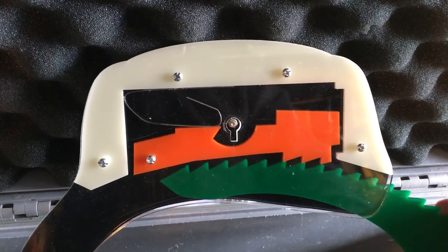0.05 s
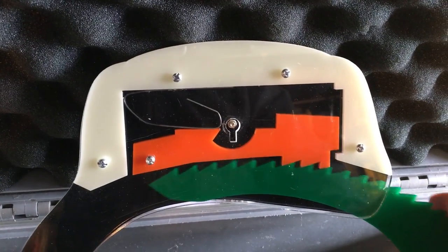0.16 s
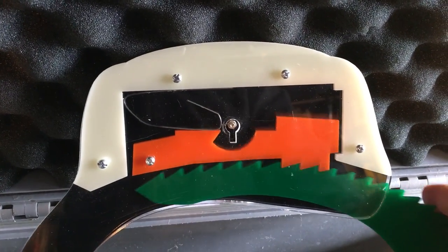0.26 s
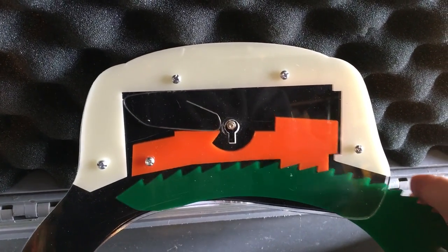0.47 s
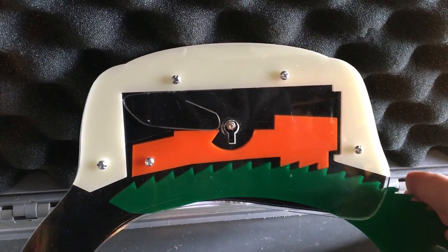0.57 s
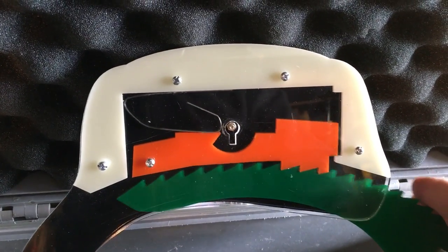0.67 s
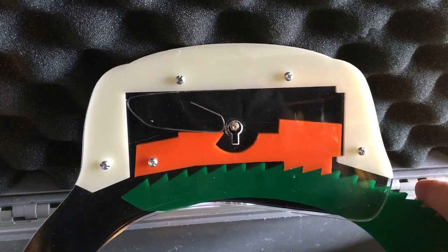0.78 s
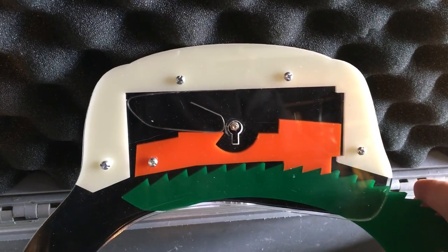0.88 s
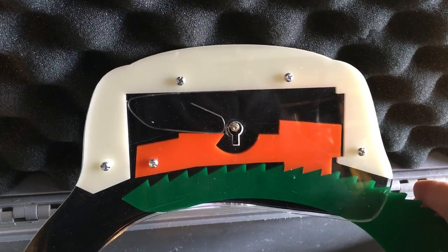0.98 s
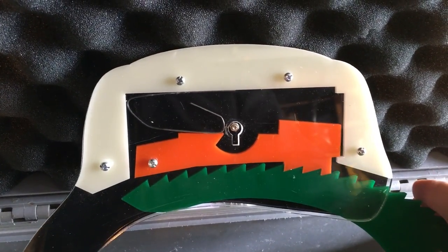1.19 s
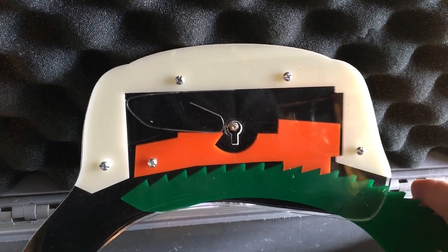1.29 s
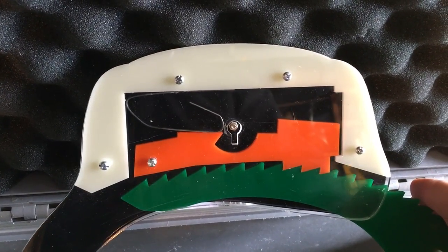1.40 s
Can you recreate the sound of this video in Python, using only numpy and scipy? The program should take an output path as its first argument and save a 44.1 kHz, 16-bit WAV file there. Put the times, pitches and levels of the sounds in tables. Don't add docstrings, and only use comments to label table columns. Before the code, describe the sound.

A hard ratchet pawl clacks over three teeth, then a faint settling tick, very close and dry.

```python
import sys
import numpy as np
from scipy import signal
from scipy.fft import rfft, irfft
from scipy.io import wavfile

SR = 44100
rng = np.random.default_rng(int(sys.argv[2]) if len(sys.argv) > 2 else 0)


def to_wav(sig):
    pcm = np.clip(np.atleast_2d(sig), -1, 1) * 32767
    pcm = np.round(pcm).astype(np.int16)
    wavfile.write(sys.argv[1], SR, pcm.T)


def invert_db(x):
    u = np.asarray(x, float) / 20
    return 10 ** u


N = 63945

# [Hz, dB per Hz]
AIR_SPECTRUM = [(20, -26.5), (40, -9.5), (70, -0.74), (135, -10), (180, -17.5), (550, -30), (980, -28),
                (2500, -38), (16000, -56.5)]
# [Hz, dB per Hz]
FRICTION_SPECTRUM = [(1000, -10), (2000, 2), (4000, -0.4), (8000, -3.5), (12000, -6), (16000, -7)]
# [Hz, s]
ROOM_DECAY = [(300, .12), (1000, 0.27), (2500, 0.19), (6000, 0.16), (12000, 0.1), (16000, .09)]
# [Hz, dB]
ROOM_SPECTRUM = [(300, -5), (1000, -3), (3000, 0.5), (5000, 0.5), (8000, -4.5), (12000, -7.5),
                 (16000, -11.5)]
ROOM_DROP_DB = [
    -1.5,
    -2.5,
    -2.5,
]
# [Hz, dB, s]
CASE_MODES = [(124, -30, .22), (141.5, -30.5, .15), (170.2, -31.5, 0.029), (210.7, -26, 0.06),
              (240, -28, 0.06), (300, -29, 0.082), (480, -48, 0.057), (610, -48.5, .03)]
# [s, dB]
THUMPS = [
    (.2040, -1.5),
    (.3435, -4),
    (0.531, -3.5),
]
# [Hz, s]
PLATE_MODES = [(530, .05), (630, .06), (925, .05), (1040, .05), (1180, .055), (1450, .035), (1650, .04)]
PLATE_DB = [
    [-48, -41, -41, -37, -44.5, -33.5, -37],
    [-41, -39.5, -46.5, -38.5, -40.5, -40, -38.5],
    [-45.5, -34.5, -28, -34.5, -32, -28, -26.5],
]
# [Hz, dB, s]
FIRST_TOOTH_MODES = [(1165, -23, 0.055), (1600, -23, 0.058), (1805, -17, 0.04), (2083, -3, .026),
                     (2240, -10.5, .019), (3000, -3, 0.013), (3280, -12, 0.036), (4310, -4, .02),
                     (5500, -6.5, 0.015), (6200, -8, .025), (7600, -13.5, 0.01), (9490, -10.5, .012),
                     (14000, -16.5, 0.011)]
SECOND_TOOTH_MODES = [(1151, -21, .04), (1600, -22, 0.032), (2026, -9.5, 0.022), (2486, -15, .018),
                      (2817, -9.5, 0.026), (3360, -5.5, 0.019), (4300, -1, .012), (4940, -13, 0.0047),
                      (5895, -3.5, 0.02), (6658, -9.5, 0.023), (8880, -19, 0.02), (11295, -16.5, 0.014),
                      (13800, -17, 0.0071)]
THIRD_TOOTH_MODES = [(1310, -12.5, 0.02205), (1976, -19.5, 0.029), (2116, -18, 0.024), (2539, -6.5, .024),
                     (3320, -8.5, 0.021), (3800, -13.5, 0.02), (4300, -0.5, 0.018), (5054, -17.5, .018),
                     (5880, -5.5, 0.025), (7400, -19.5, .02), (8220, -11, .016), (10900, -17.5, .014),
                     (12800, -12.5, 0.012)]
PIN_DB = [
    -11.5,
    -9,
    -4,
]
# [Hz, dB, s]
WIRE_MODES = [(1930, -39.5, .12), (4480, -46, 0.15), (7150, -49, .12), (11480, -43, .14),
              (11650, -44.5, .16)]
# [s, s, dB]
SCRAPES = [
    (.1935, .007, -46),
    (.335, .0055, -49.5),
    (.523, .0055, -44.5),
]
# [s, dB, Hz, s, dB]
TICKS = [(.1800, -50, 3100, 0.013, 3), (.1940, -21, 3050, 0.024, 3), (0.197, -41, 2610, 0.012, -17),
         (.1960, -16, 2090, 0.0084, -13), (0.2005, -49, 1800, 0.014, -9), (0.2542, -38, 1930, 0.016, -20),
         (0.238, -54, 3560, 0.012, 5), (0.334, -31.5, 2420, 0.022, -2.5),
         (0.3394, -19.5, 4420, 0.0049, 1.5), (0.4295, -48.5, 2020, 0.01, -5),
         (0.4443, -40, 1670, 0.012, -19), (0.4452, -43, 2260, 0.012, -24.5),
         (0.4452, -41.5, 930, 0.017, -23), (0.461, -50, 1900, 0.013, -15),
         (0.5075, -49.5, 4300, 0.0073, -5.5), (.5236, -38.5, 2560, .018, 3.5),
         (.5260, -33.5, 3525, .012, -3), (.7899, -37.5, 3330, 0.012, -13),
         (0.7907, -31.5, 2063, 0.011, 5.5), (0.7907, -37.5, 3450, 0.019, -12),
         (0.7907, -46, 1275, 0.029, -30), (0.7892, -38.5, 5550, 0.015, -4.5),
         (0.7929, -34, 2144, 0.0057, -6), (0.7930, -39.5, 4700, 0.012, -17),
         (0.7950, -39, 1600, 0.015, -23), (0.798, -43, 1746, 0.012, -30), (0.8011, -43, 1760, .012, -30),
         (0.518, -54.5, 4130, 0.012, -5.5), (0.18, -57, 11600, 0.012, -3), (0.508, -60, 11800, 0.016, -5),
         (0.822, -50.5, 1736, .016, -9)]
# [s, dB, count, dB per octave]
BLOWS = [(0.2008, -10, 0, 6.5), (0.2014, -5, 0, -1.6), (0.2021, -9.5, 0, 3.9), (.2031, -9, 0, -2.5),
         (0.2051, -10.5, 0, -0.5), (0.2106, -21, 0, -3), (0.2113, -20.5, 0, -9.5), (.3404, -2.5, 1, -0.26),
         (0.3408, -7.5, 1, 1.9), (.3420, -5.5, 1, 1.6), (0.3435, -8.5, 1, -1), (0.3446, -20, 1, -3),
         (0.35, -21, 1, -2.5), (0.352, -23.5, 1, -10.5), (0.5281, -12, 2, 0), (0.5286, -0.5, 2, 1),
         (0.5298, -8.5, 2, -5.5), (0.5303, -8.5, 2, 5.5), (0.5326, -18.5, 2, -7), (0.535, -14.5, 2, 0.34),
         (0.538, -30, 2, -2.5)]


def read(points, hz):
    frequency_hz, value = np.transpose(points)
    return np.interp(np.log(hz + 1), np.log(frequency_hz + 1), value)


def add(mix, start_s, sound):
    part = mix[round(start_s * SR):][:len(sound)]
    part += sound[:len(part)]


def coloured(points):
    gain = invert_db(read(points, np.fft.rfftfreq(N, 1 / SR)))
    noise = irfft(rfft(rng.standard_normal(N)) * gain, N)
    return noise / noise.std()


def ring(modes, phases, tilt_db=0, size=8000):
    t = np.arange(size)[:, None] / SR
    hz, level_db, t60_s = np.transpose(modes)
    envelope = invert_db(level_db + tilt_db * np.log2(hz / 3000) - 60 * t / t60_s)
    return (envelope * np.sin(2 * np.pi * (hz * t + phases))).sum(1)


def crack(low_hz, t60_s, top_hz):
    t = np.arange(4000) / SR
    noise = signal.lfilter(*signal.butter(1, min(low_hz, 9000), "high", fs=SR), rng.standard_normal(4000))
    return signal.lfilter(*signal.butter(2, top_hz, fs=SR), noise) * invert_db(-60 * t / t60_s)


def air():
    return invert_db(-51.5) * coloured(AIR_SPECTRUM)


def slide():
    from_s, to_s = .193, .94
    t = np.arange(N) / SR
    onset = np.clip((t - from_s) / 0.013, 0, 1)
    release = np.clip((to_s - t) / 0.0029, 0, 1)
    level_db = -65.5 + 0.5 * (t - from_s) / (to_s - from_s)
    return onset * release * invert_db(level_db) * coloured(FRICTION_SPECTRUM)


def room(source):
    gap_s, late_db, late_t60_s = .002, -29.5, 0.96
    out = np.zeros(N)
    drop_index = np.digitize(np.arange(N) / SR, [.3, .5])
    for k in range(3):
        hz, t, noise = signal.stft(rng.standard_normal(SR // 2), SR, nperseg=128)
        early = invert_db(-60 * t / read(ROOM_DECAY, hz)[:, None])
        late = invert_db(late_db - 60 * t / late_t60_s)
        colour = invert_db(read(ROOM_SPECTRUM, hz))[:, None]
        tail = signal.istft(noise * (early + late) * colour, SR, nperseg=128)[1]
        tail *= np.arange(len(tail)) / SR > gap_s
        tail /= np.linalg.norm(tail)
        out += invert_db(ROOM_DROP_DB[k]) * signal.fftconvolve(source * (drop_index == k), tail)[:N]
    return invert_db(-18) * out


def case():
    thump_rise_s, plate_rise_s = 0.0061, .002
    out = np.zeros(N)
    t = np.arange(12000) / SR
    for (start_s, level_db), plate_db, (blow_s, *_) in zip(THUMPS, PLATE_DB, BLOWS[1::7]):
        thump = (1 - np.exp(-t / thump_rise_s)) * ring(CASE_MODES, 0, size=12000)
        add(out, start_s, invert_db(level_db) * thump)
        plates = [(hz, db, t60_s) for (hz, t60_s), db in zip(PLATE_MODES, plate_db)]
        add(out, blow_s, (1 - np.exp(-t / plate_rise_s)) * ring(plates, 0, size=12000))
    return out


def squeak(out):
    start_s, end_s, pitch_hz, level_db, grow_db = .1815, .1945, 3180, -44, 10
    t = np.arange(0, end_s - start_s, 1 / SR)
    growth = invert_db(level_db - grow_db * (1.5 - t / t[-1]))
    add(out, start_s, growth * np.sin(2 * np.pi * pitch_hz * t))


def scrapes(out):
    for start_s, length_s, level_db in SCRAPES:
        add(out, start_s, invert_db(level_db) * crack(2500, .05, 13000)[:round(length_s * SR)])


def ticks(out, spread):
    rise_s = 0.0002
    for start_s, level_db, hz, t60_s, crack_db in TICKS:
        modes = [(hz, 0, t60_s), (hz * 1.45, -11.5, t60_s * .8),
                 (hz * 0.64, -10.5, t60_s), (hz * 2.3, -25, t60_s * .7)]
        body = ring(modes, 0, size=4000)
        rise = np.minimum(np.arange(4000) / SR / rise_s, 1)
        tick = invert_db(level_db) * rise * (body + invert_db(crack_db) * crack(hz, 2.9 * t60_s, 1.3 * hz))
        add(out, start_s, tick)
        add(spread, start_s, tick)


def blows(out, spread):
    pin_hz, pin_t60_s = 11650, .024
    detune, damping = .02, .5
    blunt_db, spread_t60_s = -15, .002
    teeth = (FIRST_TOOTH_MODES, SECOND_TOOTH_MODES, THIRD_TOOTH_MODES)
    for start_s, level_db, tooth_index, tilt_db in BLOWS:
        k = int(round(tooth_index))
        modes = np.vstack([teeth[k], [(pin_hz, PIN_DB[k], pin_t60_s)]])
        chance, phases = rng.random((2, len(modes)))
        shift = 1 + detune * (chance - .5)
        loss = np.minimum(2000 / modes[:, 0], 1) ** damping
        shifted = modes * np.transpose([shift, np.ones(len(modes)), loss])
        body = ring(shifted, phases, tilt_db)
        t = np.arange(len(body)) / SR
        add(spread, start_s, invert_db(level_db + blunt_db - 60 * t / spread_t60_s) * body)
        add(body, 0, invert_db(-3.5 + 2 * tilt_db) * crack(2340, 0.0069, 13000))
        add(body, 0, invert_db(-16) * crack(1300, 0.035, 12900))
        add(body, 0, ring(WIRE_MODES * np.array([shift[0], 1, 1]), phases[:len(WIRE_MODES)]))
        onset = np.minimum(np.arange(len(body)) / 6, 1)
        add(out, start_s, invert_db(level_db - 4.5) * onset * body)
    for start_s, *_ in BLOWS[1::7]:
        add(spread, start_s, invert_db([9.5]))


def pawl():
    out, spread = np.zeros((2, N))
    blows(out, spread)
    ticks(out, spread)
    scrapes(out)
    squeak(out)
    low_cut = signal.butter(8, 950, "high", fs=SR, output="sos")
    return signal.sosfilt(low_cut, [out, spread])


def scene():
    near, spread = pawl()
    return (near + case() + room(spread) + slide() + air())[None]


def top_cut(x):
    return signal.sosfilt(signal.butter(12, 16620, fs=SR, output="sos"), x)


def record(dry):
    ceiling = 1.05
    limited = ceiling * np.tanh(dry / ceiling)
    low_pass = signal.firwin(255, 15950, window=("kaiser", 8), fs=SR)
    mix = signal.oaconvolve(limited, low_pass[None], "same")
    return top_cut(mix)


dry = scene()
out = record(dry)
to_wav(out)
```